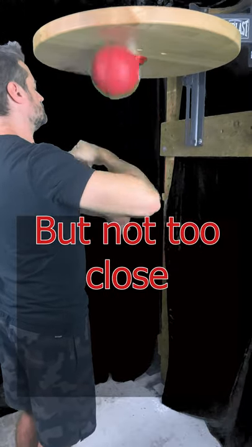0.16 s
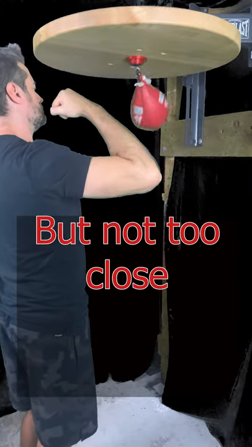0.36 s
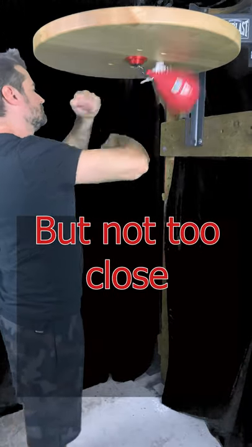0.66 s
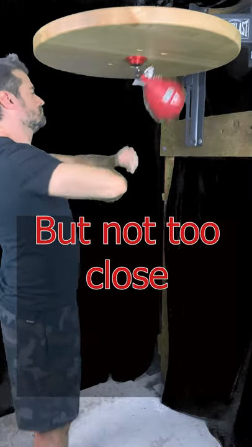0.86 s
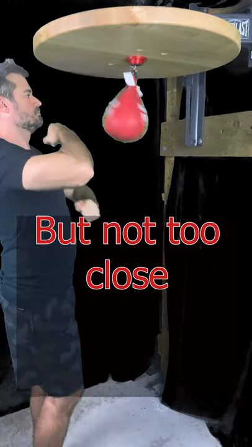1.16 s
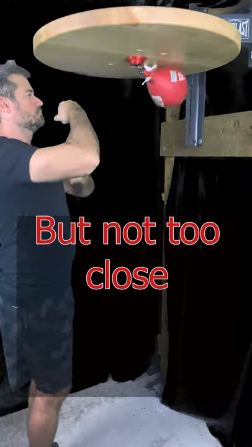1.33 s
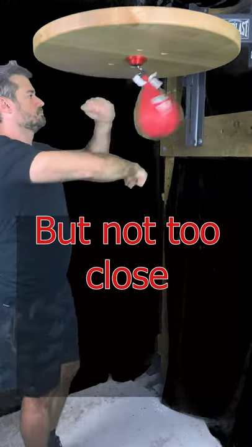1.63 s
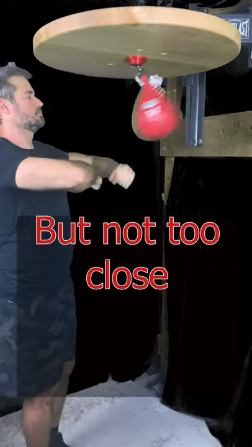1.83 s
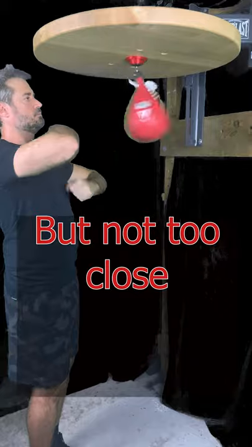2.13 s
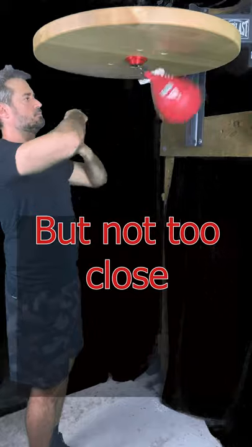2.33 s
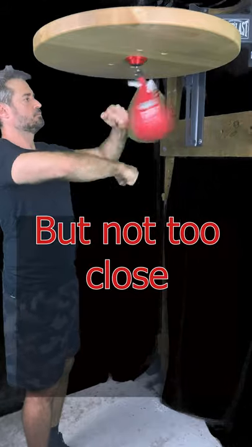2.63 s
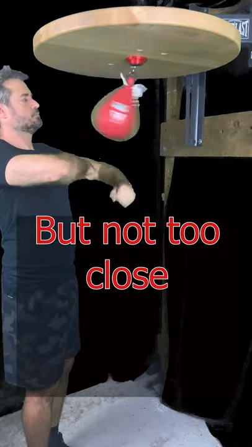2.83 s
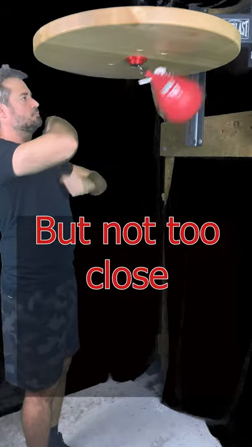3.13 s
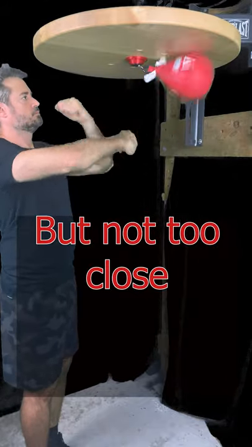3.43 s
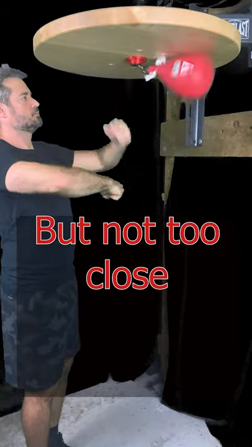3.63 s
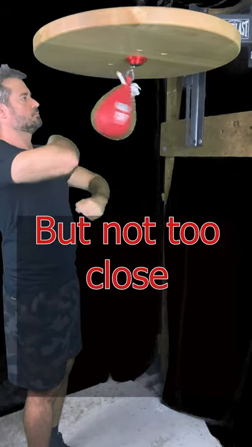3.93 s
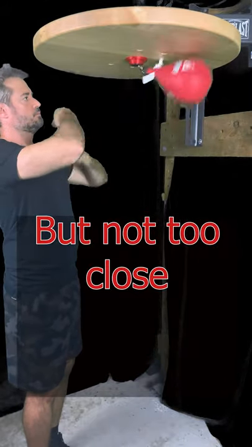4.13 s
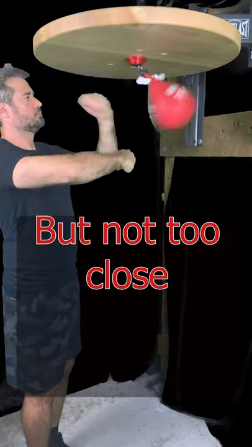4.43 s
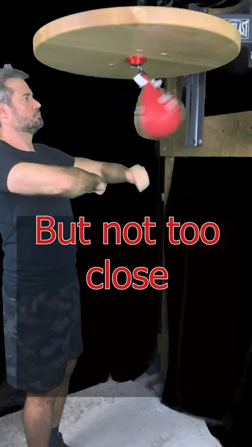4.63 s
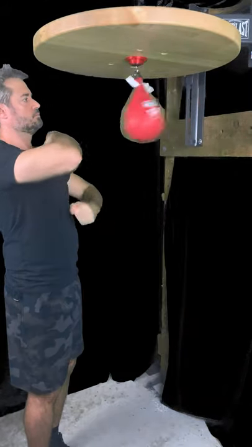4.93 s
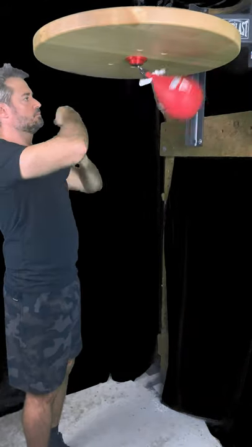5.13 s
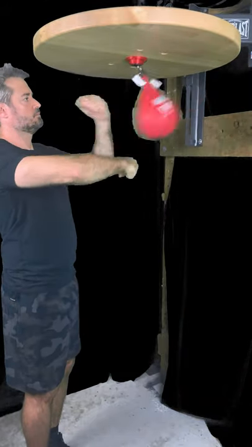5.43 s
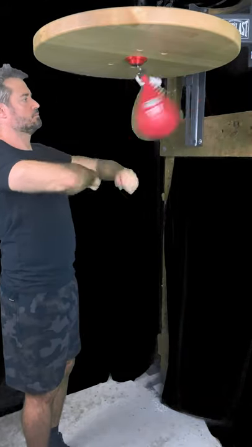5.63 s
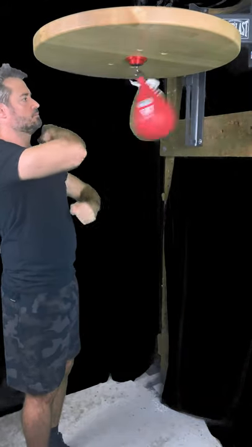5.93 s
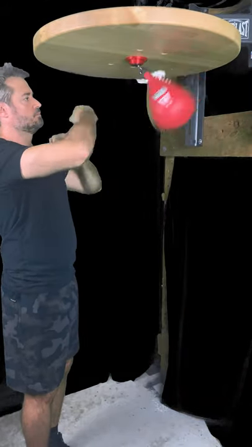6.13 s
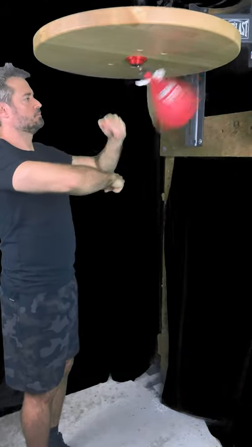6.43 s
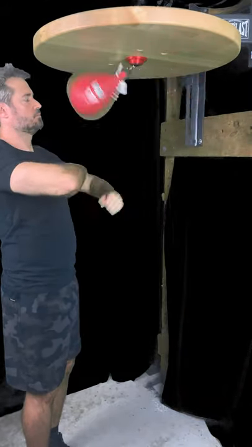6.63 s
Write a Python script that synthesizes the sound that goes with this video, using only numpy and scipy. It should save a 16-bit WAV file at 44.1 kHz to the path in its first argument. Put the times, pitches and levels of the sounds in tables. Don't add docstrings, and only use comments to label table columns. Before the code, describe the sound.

Close phone pickup of fists on a leather bag hung under a wooden board. Dull smacks lead to bright slaps about a fifth of a second apart, two strong ones per group, followed by a lighter near-side rebound and a quiet tap. Brief swishes and leather scuffs precede landings; small-room boom and hiss trail over faint rumble.

```python
import sys
import numpy as np
from scipy import signal
from scipy.fft import rfft, irfft
from scipy.io import wavfile

SR = 44100
rng = np.random.default_rng(int(sys.argv[2]) if len(sys.argv) > 2 else 0)


def ratio(d):
    e = np.asarray(d, float) / 20
    return 10 ** e


def inscribe(sig):
    pcm = np.round(np.clip(np.atleast_2d(sig).T, -1, 1) * 32767)
    wavfile.write(sys.argv[1], SR, pcm.astype(np.int16))


N = 298998
HZ = np.fft.rfftfreq(N, 1 / SR)


def on_log(points, hz):
    f, v = np.transpose(points)
    return np.interp(np.log(hz + 1), np.log(f), v)


def fade(t, t60):
    return np.exp(-np.log(1000) * t / t60)


def add(track, s, sound):
    i = int(np.clip(round(s * SR), 0, len(track)))
    track[i:i + len(sound)] += sound[:len(track) - i]


def tone(hz, t):
    return np.sin(2 * np.pi * hz * t)


def octave_bell(centre_hz, width_octaves):
    return np.exp(-.5 * (np.log2((HZ + 1) / centre_hz) / width_octaves) ** 2)


# (time [s], snap [dB], weight [dB], bag pitch [Hz])
FAR_HITS = [(0.448, -32, -34.5, 1280), (0.6986, -14.5, -22.5, 1650), (0.856, -12, -23.5, 1440),
            (1.3472, -33, -36, 1510), (1.5661, -16.5, -27, 1524), (1.7685, -15.5, -26, 1574),
            (2.2787, -36, -33.5, 1640), (2.5367, -17, -27, 1390), (2.7212, -15.5, -26, 1560),
            (3.2076, -27.5, -34.5, 1577), (3.456, -15, -31.5, 1390), (3.6545, -14.5, -24.5, 1620),
            (4.1341, -31, -36, 1483), (4.39, -20.5, -30, 1500), (4.577, -18, -26, 1970),
            (5.0913, -33.5, -37, 1480), (5.3657, -20, -29, 1500), (5.5767, -15.5, -27.5, 1390),
            (6.0666, -28.5, -35, 1390), (6.3029, -15.5, -28, 1210), (6.492, -15, -25, 1640)]
# (time [s], snap [dB], weight [dB], bag pitch [Hz])
NEAR_HITS = [
    (0.1718, -20, -30, 1570),
    (1.063, -27, -29.5, 1510),
    (1.9914, -23.5, -31, 1430),
    (2.9309, -20.5, -29.5, 1680),
    (3.8595, -21.5, -27.5, 1974),
    (4.7994, -23, -28.5, 1640),
    (5.7882, -22, -28.5, 1820),
    (6.6821, -18, -26.5, 2050),
]
# (time [s], snap [dB], weight [dB], bag pitch [Hz])
FIST_HITS = [(0.0024, -19.5, -33.5, 1040), (0.615, -24.5, -33.5, 1230), (0.7857, -23, -31, 1030),
             (1.484, -28.5, -41, 1040), (1.6793, -33, -34.5, 1180), (2.446, -33.5, -38, 1740),
             (2.6395, -28, -33, 1636), (3.3655, -32, -38.5, 1630), (3.5697, -30.5, -32.5, 1620),
             (4.2904, -28.5, -35, 1800), (4.5015, -31, -31.5, 1150), (5.2636, -31, -40.5, 1230),
             (5.4897, -22, -32.5, 1230), (6.221, -37, -37.5, 1625), (6.4126, -24, -29.5, 1830)]
# (snap [dB], weight [dB])
MIDDLING_HIT = (-24, -30)
# (middling level [dB], per snap [dB/dB], per weight [dB/dB])
SLAP_FOLLOWS = dict(far=(-12, 0.81, .05), near=(-9.5, 0.34, 0.65), fist=(-12.5, 0.36, 0.91))
# (middling level [dB], per snap [dB/dB], per weight [dB/dB])
THUMP_FOLLOWS = dict(far=(-30, 0.56, 0.092), near=(-30.5, 0.15, 1), fist=(-22.5, 0.023, 0.46))


def contacts(rows, face):
    s, snap, weight, hz = np.transpose(rows)
    middling_snap, middling_weight = MIDDLING_HIT

    def level(db, per_snap, per_weight):
        return db + per_snap * (snap - middling_snap) + per_weight * (weight - middling_weight)

    flat_until_s, flat_db = 1.2, -3.5
    slap = level(*SLAP_FOLLOWS[face]) + flat_db * (s < flat_until_s)
    return np.transpose([s, slap, level(*THUMP_FOLLOWS[face]), weight, hz, snap])


# (delay [s], level [dB])
RING_RETURNS = [(.009, -7), (.016, -18), (.027, -19.5), (.04, -20), (.057, -20.5), (.075, -22.5),
                (.098, -24.5)]
# (delay [s], level [dB])
SLAP_RETURNS = [(.0027, -17), (.0065, -23)]
# (frequency [Hz], level [dB per Hz])
SLAP_TONE = [(200, -24.5), (500, -2.5), (1000, -18), (2000, 5), (3500, -2), (5000, 4), (6500, 10.5),
             (9000, 8), (12000, 8), (15500, -0.5), (17000, -7)]


def slaps(hits, t60, grit_db, second_s, second_db, ring_t60, echo_t60=0.018, upper_ratio=1.792, upper_db=-7):
    left, right, ring = np.zeros((3, N))
    spread_samples = 3
    t = np.arange(1024) / SR
    for (s, slap_db, _, ring_db, hz, _), grit in zip(hits, rng.standard_normal((len(hits), 1024))):
        burst = ratio(grit_db) * grit * fade(t, t60)
        burst[0] += 1
        add(burst, second_s * (1 + .12 * grit[-1]), ratio([second_db + 2.5 * grit[-2]]))
        burst *= ratio(slap_db)
        add(right, s + .0008, burst)
        add(left, s + .0008 + spread_samples * grit[-3] / SR, burst)

        add(ring, s + 0.000983, tone(hz, t) * fade(t, ring_t60) * ratio(ring_db))
        upper = tone(hz * upper_ratio * (1 + 0.086 * grit[-4]), t) * fade(t, ring_t60)
        add(ring, s + 0.001017, upper * ratio(ring_db + upper_db + 2.8 * grit[-5]))
        for (delay, db), (late, size, detune) in zip(RING_RETURNS, grit[500:521].reshape(7, 3)):
            back = tone(hz * (1 + .16 * detune), t) * np.sqrt(t / .004) * fade(t, echo_t60)
            add(ring, s + delay * (1 + .06 * late), back * ratio(ring_db + db + 3 * size))
    returns = np.zeros(1024)
    returns[0] = 1
    for delay, db in SLAP_RETURNS:
        add(returns, delay, ratio([db]))
    crack = signal.fftconvolve([left, right], [returns])[:, :N]
    return irfft(rfft(crack) * ratio(on_log(SLAP_TONE, HZ)), N), ring


# (delay [s], level [dB])
FAR_RETURNS = [(.0055, -9), (.012, -3), (.0235, -1), (.032, -7), (.04, -12), (.048, -6), (.061, -3),
               (.073, -3), (.087, -6), (.1, -9)]
# (delay [s], level [dB])
NEAR_RETURNS = [(.0055, -9), (.012, -3), (.0225, -.5), (.032, -8), (.04, -8), (.053, -7), (.07, -7),
                (.081, -8), (.094, -7), (.105, -12)]
# (delay [s], level [dB])
FIST_RETURNS = [(.007, -14), (.013, -12), (.0245, .5), (.0375, -7), (.053, -12), (.072, -11)]
# (frequency [Hz], level [dB], decay t60 [s])
BOOM_MODES = [(54.6, -21, 1.1), (76.76, -8.5, 0.41), (83.14, -24.5, 1.8), (99.7, -19, 0.96),
              (125.6, -13, 0.29), (169.9, -21, 0.92), (202.6, -11.5, 0.36)]


def thump(hits, echoes, width_s, boom_db):
    t = np.arange(int(.8 * SR)) / SR

    def push_pull(at):
        return (at - t) / width_s * np.exp(.5 - .5 * ((t - at) / width_s) ** 2)

    answer = sum(ratio(db) * push_pull(delay) for delay, db in echoes)
    swell = 1 - np.exp(-(t / 0.043) ** 2)
    boom = sum(ratio(db) * tone(hz, t) * fade(t, t60) for hz, db, t60 in BOOM_MODES)
    answer += ratio(boom_db) * swell * boom
    blows = np.zeros(N)
    for s, _, db, *_ in hits:
        add(blows, s, ratio([db]))
    return signal.fftconvolve(blows, answer)[:N]


# (frequency [Hz], level [dB], decay t60 [s])
BOARD_MODES = [(321.6, 6.5, 0.082), (384.5, 4, 0.093), (462, 1.5, 0.049), (663, -0.5, 0.22),
               (822, -7, 0.092), (1210, -3, 0.14), (1390, -6.5, 0.27), (1640, 7, 0.051),
               (2034, -33.5, 0.023)]


def board(hits, level_db, scatter_db):
    out = np.zeros(N)
    t = np.arange(8192) / SR
    hz, db, t60 = np.transpose(BOARD_MODES)[:, :, None]
    for hit, (size, shift) in zip(hits, rng.standard_normal((len(hits), 2, len(BOARD_MODES), 1))):
        modes = ratio(db + scatter_db * size) * tone(hz * (1 + 0.0066 * shift), t) * fade(t, t60)
        add(out, hit[0] + 0.001425, modes.sum(axis=0) * ratio(hit[3] + level_db))
    return out


# (time [s], level [dB])
NECK_SCUFFS = [(0.414, -58), (.6783, -53), (1.3086, -56), (1.9707, -50), (2.2432, -67), (2.5216, -43.5),
               (2.7035, -38.5), (2.9103, -49), (3.1722, -58), (3.8257, -51), (4.1016, -54), (4.561, -36),
               (4.7775, -53), (5.3479, -40), (6.0312, -59), (6.287, -39)]


def scuff(gain_db, t60):
    t = np.arange(4096) / SR
    rub = np.zeros(N)
    for s, db in NECK_SCUFFS:
        add(rub, s, ratio(db + gain_db) * fade(t, t60))
    grip = ratio(3 * rng.standard_normal(N // 64 + 1)).repeat(64)[:N]
    band = signal.butter(2, [950, 1700], "band", fs=SR, output="sos")
    return rub * signal.sosfilt(band, rng.standard_normal(N) * grip)


def swish(hits, db, lead_s):
    t = np.arange(2048) / SR
    gust = np.zeros(N)
    for s, slap_db, *_ in hits:
        add(gust, s - t[-1], ratio(db + .5 * slap_db) * np.exp(-t[::-1] / lead_s))
    band = signal.butter(1, [500, 2500], "band", fs=SR, output="sos")
    return gust * signal.sosfilt(band, rng.standard_normal((2, N)))


def energy(hits, level_db):
    lumps = np.zeros(N)
    for hit, db in zip(hits, level_db):
        add(lumps, hit[0] + .002, ratio([2 * db]))
    return lumps


def decay(lumps, t60):
    return signal.lfilter([1], [1, -fade(2 / SR, t60)], lumps)


# (frequency [Hz], level [dB], decay t60 [s], likeness of the two ports [0-1])
ROOM_BANDS = [(138.6, -16.5, 0.94, 0.7), (197, -22, 0.66, 0.8), (364, -23, 0.74, 0.9),
              (651, -25.5, 0.51, 0), (1040, -26.5, 0.51, 0.3), (1500, -24, 0.43, 0.62),
              (2350, -29.5, 0.48, 0), (4000, -33.5, 0.45, 0.37), (6000, -35.5, 0.43, 0.5),
              (10000, -38, 0.38, 0.4), (15400, -48, 0.13, 0.3)]
# (frequency [Hz], level [dB])
KNUCKLE_TONE = [(200, 6.5), (600, -0.5), (1500, -4), (4800, -7.5), (7000, -6), (11000, -2.5), (14500, -3)]


def room(wood, fist, board_db, fist_db, body_db, split_hz, pitch_db, pitch_octaves):
    rows, out = np.array(ROOM_BANDS), 0
    white = rfft(rng.standard_normal((2, 2, N)))
    bright = [energy(h, h[:, 5]) for h in (wood, fist)]
    for k, hz in enumerate(127 * 2 ** np.arange(0, 7.1, .5)):
        db, t60, like = (on_log(rows[:, [0, column]], hz) for column in (1, 2, 3))
        body = []
        for h in (wood, fist):
            tuned = pitch_db * np.exp(-.5 * (np.log2(hz / h[:, 4]) / pitch_octaves) ** 2)
            body.append(energy(h, h[:, 3] + body_db + tuned))
        share = 1 / (1 + (split_hz / hz) ** 2)
        gains = ratio([2 * board_db, 2 * (fist_db + on_log(KNUCKLE_TONE, hz))])
        lumps = sum(g * (share * b + (1 - share) * d) for g, b, d in zip(gains, bright, body))
        lumps[lumps > 0] *= ratio(2 * 1.2 * rng.standard_normal(np.count_nonzero(lumps)))
        stored = decay(lumps, t60) + ratio(-4.5) * decay(lumps, 0.22) - decay(lumps, .003)

        band = octave_bell(hz, .25) / (1 + (HZ / 15300) ** 60)
        mid, side = irfft(white[k % 2] * band, N)
        like = np.clip(like, 0, 1)
        pair = np.sqrt(1 + like) * mid + np.sqrt(1 - like) * side * np.array([[1], [-1]])
        out = out + ratio(db) * pair * np.sqrt(np.maximum(stored, 0))
    return out


def rumble():
    return irfft(rfft(rng.standard_normal(N)) * octave_bell(62, 0.3), N)


# (frequency [Hz], level [dB per Hz])
FLOOR_TONE = [(30, -21), (80, -15.5), (200, -2.5), (600, -22.5), (1500, -17), (4000, -74), (10000, -63),
              (17000, -68)]


def floor():
    return irfft(rfft(rng.standard_normal((2, N))) * ratio(on_log(FLOOR_TONE, HZ)), N)


def scene():
    far, near, fist = contacts(FAR_HITS, "far"), contacts(NEAR_HITS, "near"), contacts(FIST_HITS, "fist")
    wood = np.vstack([far, near])
    far_skin = dict(t60=0.0016, grit_db=-20, second_s=0.00013, second_db=-20.0, ring_t60=0.0095)
    near_skin = dict(t60=0.0013, grit_db=-21.5, second_s=0.00047, second_db=-13.0, ring_t60=0.0097)
    fist_skin = dict(t60=0.0064, grit_db=-11.5, second_s=0.0068, second_db=-2.5, ring_t60=0.0087)
    # (hits, skin, echoes, thump width [s], boom, thump, ring, crack [dB])
    kinds = [(far, far_skin, FAR_RETURNS, .0022, 2.5, 4.5, 11, 3),
             (near, near_skin, NEAR_RETURNS, .0022, -2.5, 3.5, 11, 3),
             (fist, fist_skin, FIST_RETURNS, .0025, -3.5, 5.5, 8, -3)]
    out = np.zeros((2, N))
    for hits, skin, echoes, width_s, boom_db, thump_db, ring_db, crack_db in kinds:
        crack, ring = slaps(hits, **skin)
        out += ratio(crack_db) * crack + ratio(ring_db) * ring
        out += ratio(thump_db) * thump(hits, echoes, width_s, boom_db)
    out += board(wood, level_db=-15.5, scatter_db=6)
    out += scuff(gain_db=13, t60=.1)
    out += swish(wood, db=-41.5, lead_s=0.02)
    out += room(wood, fist, board_db=20, fist_db=24.5, body_db=4.0, split_hz=3500,
                pitch_db=2.5, pitch_octaves=0.22)
    return out + ratio(-18) * rumble() + ratio(-35.5) * floor()


def low_pass(x):
    return signal.sosfilt(signal.butter(12, 17150, fs=SR, output="sos"), x)


# (frequency [Hz], left minus right [dB])
PORT_BALANCE = [(60, -2), (110, -2.5), (200, -4), (380, -4.5), (700, -3.5), (1290, -2), (2380, -2.5),
                (4000, 2), (6000, 3), (7200, 0)]


def record(dry):
    left, right = rfft(dry)
    port_samples, lead_samples, late_samples = 2.2, 3.0, 8.92
    cross_hz, bend_hz, bend_rad = 5000, 6300, .7
    treble = 1 / (1 + (cross_hz / (HZ + 1)) ** 14)
    passband = 1 / (1 + (HZ / 16100) ** 60) / np.sqrt(1 + (53 / (HZ + 1)) ** 12)
    tilt = ratio(on_log(PORT_BALANCE, HZ) / 2)

    def lag(samples):
        return np.exp(-2j * np.pi * HZ * samples / SR)

    bend = np.exp(-1j * bend_rad * octave_bell(bend_hz, .3))
    top = np.sqrt(treble) * right * lag(-lead_samples)
    left = np.sqrt(1 - treble) * left + top
    right = np.sqrt(1 - treble) * right * lag(port_samples) - top * lag(late_samples) * bend
    both = irfft(np.array([left * tilt, right / tilt]) * passband, N)
    both = .96 * np.tanh(both / 1.3) / np.tanh(1 / 1.3)
    return low_pass(both)


dry = scene()
out = record(dry)
inscribe(out)
```